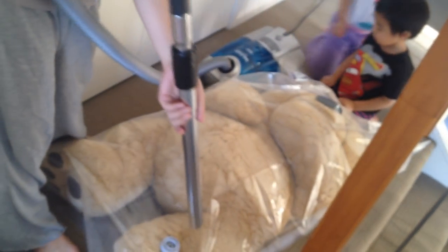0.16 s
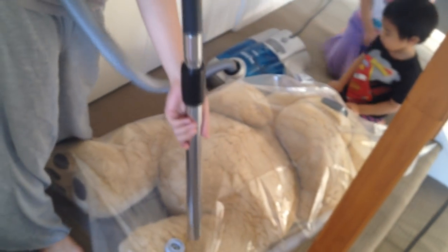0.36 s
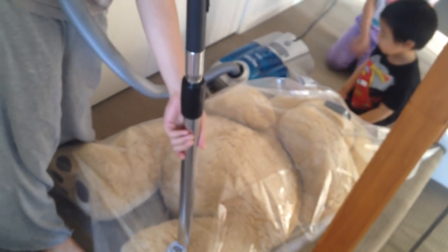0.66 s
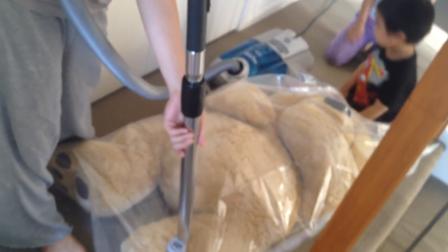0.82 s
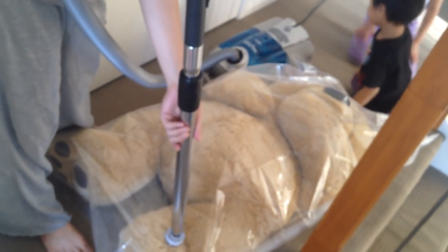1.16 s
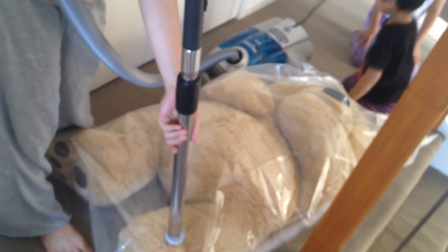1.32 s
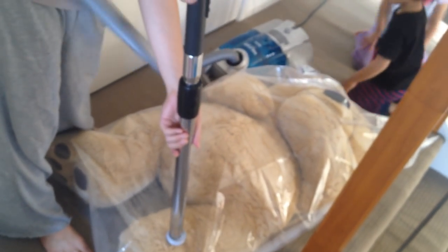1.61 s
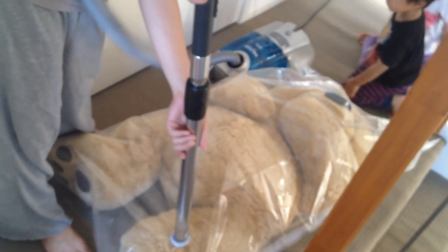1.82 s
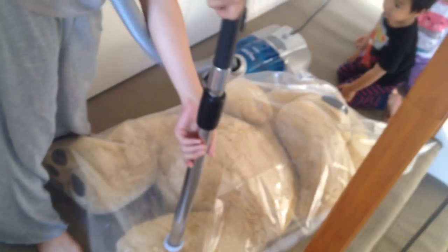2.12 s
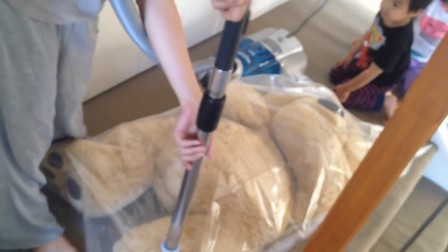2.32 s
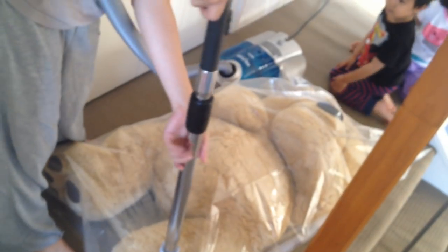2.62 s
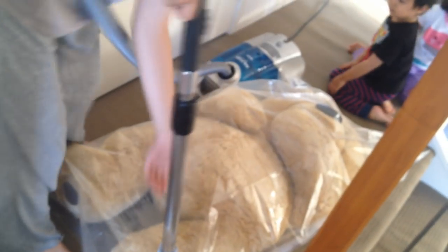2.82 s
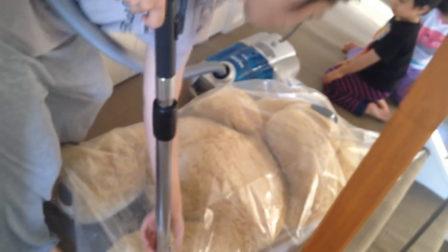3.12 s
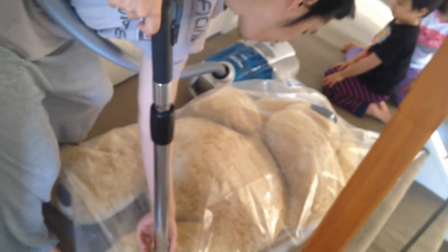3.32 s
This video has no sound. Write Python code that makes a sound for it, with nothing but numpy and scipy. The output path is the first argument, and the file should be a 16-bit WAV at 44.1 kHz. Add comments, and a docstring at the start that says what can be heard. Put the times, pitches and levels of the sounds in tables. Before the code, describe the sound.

A vacuum cleaner runs nearby in a room with a steady roar and faint whine. Its nozzle knocks against a storage bag's valve, hisses loudly and snaps tight. The motor rises in pitch while the plastic faintly crinkles.

```python
"""The steady roar and faint whine of a canister vacuum cleaner fill a living room, as turbulent air
rushes into its open metal wand. The wand knocks against the valve of a plastic storage bag, air hisses
through the gap, and it snaps home. With the flow choked, the motor speeds up and the roar thins;
the bag rumbles and crinkles as it empties."""
import sys
import numpy as np
from scipy import signal
from scipy.fft import rfft, irfft
from scipy.io import wavfile
from scipy.ndimage import uniform_filter1d

SR = 44100
rng = np.random.default_rng(int(sys.argv[2]) if len(sys.argv) > 2 else 0)


def transcribe(signal):
    """Save signal, clipped to [-1, 1], as a 16-bit WAV file at the path in sys.argv[1]."""
    frames = np.atleast_2d(signal).T
    limited = np.clip(frames, -1, 1)
    pcm = np.round(limited * 32767).astype(np.int16)
    wavfile.write(sys.argv[1], SR, pcm)


N = 152586
T = np.arange(N) / SR


def undb(db):
    """Amplitude grows tenfold for every 20 dB."""
    return 10 ** (np.asarray(db) / 20)


def unit(x):
    """Normalisation to an rms of 1."""
    return x / np.sqrt(np.mean(x ** 2) + 1e-20)


def curve(rows):
    """Linear interpolation between rows of time in seconds and value."""
    return np.interp(T, *np.array(rows, float).T)


def step(at_s, length_s):
    """A smooth transition from 0 to 1."""
    return .5 + .5 * np.tanh((T - at_s) / length_s)


def walk(rate_hz):
    """Smoothing held random values gives a slow drift of rms 1."""
    hold = int(SR / rate_hz)
    stairs = np.repeat(rng.standard_normal(400), hold)[:N]
    return unit(uniform_filter1d(uniform_filter1d(stairs, hold), hold))


def noise():
    """Independent samples have a white spectrum."""
    return rng.standard_normal(N)


def colour(x, points):
    """A minimum-phase, hence causal, filter through points of frequency in Hz and gain in dB."""
    hz, db = np.array(points, float).T
    bins_hz = np.maximum(np.fft.rfftfreq(N, 1 / SR), 1)
    gain = undb(np.interp(np.log(bins_hz), np.log(hz), db))
    cepstrum = irfft(np.log(gain), N)
    cepstrum[1:N // 2] *= 2
    cepstrum[N // 2 + 1:] = 0
    return irfft(rfft(x) * np.exp(rfft(cepstrum)), N)


def band(x, hz, width_hz):
    """Two resonators in cascade pass a steep band, scaled to rms 1."""
    b, a = signal.iirpeak(hz, hz / width_hz, SR)
    return unit(signal.lfilter(b, a, signal.lfilter(b, a, x)))


def tail(t60_s):
    """Dense reflections merge into exponentially decaying noise, here of unit energy."""
    response = noise() * undb(-60 * T / t60_s)
    return response / np.sqrt(np.sum(response ** 2))


def room(x):
    """Reverberation: the bright reflections of a furnished room add to the direct sound."""
    low_cut = signal.butter(2, 880, "high", fs=SR, output="sos")
    walls = signal.sosfilt(low_cut, tail(t60_s=0.33))
    return x + undb(-5.5) * signal.fftconvolve(x, walls)[:N]


def air(points):
    """Turbulence radiates broadband noise that flickers band by band and swells as a whole."""
    flicker_db, swell_db = 0.5, 0.34
    spectrum = rfft(noise())
    zone = np.digitize(np.fft.rfftfreq(N, 1 / SR), [300, 700, 1500, 3000, 6500, 9500])
    flow = sum(irfft(spectrum * (zone == k), N) * undb(flicker_db * walk(24.45))
               for k in np.unique(zone))
    return unit(colour(room(flow), points)) * undb(swell_db * walk(4.88))


def suction():
    """Flow noise: the roar of the open wand gives way to the thinner rush of the sealed one."""
    # Spectra of the open and the sealed wand. Each row: frequency in Hz, relative density in dB.
    open_spectrum = [(60, -37), (140, -20.5), (180, -12), (240, -3.5), (320, -8), (400, -4.5), (460, -10),
                     (660, -9), (780, -4.5), (930, -5), (1420, -6.5), (2300, -4.5), (3300, -14),
                     (4200, -11.5), (5500, -16), (6400, -12.5), (7600, -3.5), (8600, -2), (9700, -8.5),
                     (11000, -7.5), (13100, -13), (14000, -20), (15500, -25)]
    sealed_spectrum = [(60, -35), (110, -23), (160, -10.5), (270, -8.5), (360, -13.5), (470, -13),
                       (680, -14), (1000, -12), (1120, -9.5), (1450, -9), (1800, -6.5), (2350, -6),
                       (3500, -15), (4300, -10.5), (5300, -14.5), (6400, -13.5), (7900, -1), (9000, -2),
                       (11700, -5), (13700, -9), (15500, -23.5)]
    touch_s, seal_s = 1.49, 1.885  # the nozzle covers the valve; the gap closes
    uncovered = 1 - step(touch_s, 0.0086)
    approach = np.exp(np.minimum(T - touch_s, 0) / 0.47)  # the mids swell as the nozzle nears the bag
    mids = undb(-42) * approach * band(noise(), hz=2100, width_hz=1500)
    roar = undb(-37) * air(open_spectrum) + mids
    rush = undb(-35) * air(sealed_spectrum)
    return uncovered * roar + step(seal_s, 0.022) * rush


def motor():
    """A rotor sounds at multiples of its shaft rate, which rises as the airflow is choked."""
    # Motor speed. Each row: time in seconds, shaft rate in Hz.
    speed = [(0, 491.2), (1.5, 492.4), (1.57, 494.8), (1.7, 502.5), (1.82, 510), (1.9, 512), (2.0, 518.6),
             (2.24, 527.2), (2.41, 530.7), (2.62, 532.8), (2.9, 534.5), (3.46, 536.6)]
    # Tones at the shaft rate, the blade rate and its octave. Each row: time in seconds, level in dB.
    shaft_tone = [(0, -59.5), (.8, -55.5), (1.45, -56), (1.58, -71), (1.72, -55.5), (1.85, -59),
                  (2.03, -59.5), (2.15, -59), (2.6, -56.5), (3.46, -56.5)]
    whine = [(0, -57), (.75, -57), (1.0, -51), (1.45, -50), (1.56, -53), (1.85, -50), (2.02, -49),
             (2.1, -56), (2.23, -49), (2.33, -58), (2.45, -48), (2.56, -42), (2.7, -38.5), (2.8, -43),
             (2.92, -51), (3.46, -53)]
    octave = [(0, -61), (.55, -59), (.72, -49), (1.4, -57), (1.88, -57), (1.945, -32), (1.99, -48),
              (2.5, -56), (3.0, -56.5), (3.46, -47)]
    # Shaft overtones. Each row: multiple of the shaft rate, level in dB.
    overtones = [(2, -65.5), (3, -85), (4, -83)]
    blades, wow, flutter_db = 9, 0.0003, 0.5
    phase = 2 * np.pi * np.cumsum(curve(speed) * (1 + wow * walk(30.15))) / SR
    tones = [(1, curve(shaft_tone)), (blades, curve(whine)), (2 * blades, curve(octave))] + overtones
    return np.sqrt(2) * sum(undb(db + flutter_db * walk(22.37)) * np.sin(k * phase) for k, db in tones)


def room_tone():
    """The noise floor: the faint bass of the house and a trace of mains hum."""
    # Spectrum of the quiet room. Each row: frequency in Hz, relative density in dB.
    spectrum = [(30, -3), (60, -13), (100, 10), (200, 13.5), (1000, -4), (15000, -40)]
    mains = undb(-80.5) * np.sin(2 * np.pi * 96.4 * T)
    return undb(-71) * unit(colour(noise(), spectrum)) + mains


def leak():
    """A jet between nozzle and valve hisses, with edge tones while the flow is fastest."""
    # Envelope of the hiss. Each row: time in seconds, level in dB.
    envelope = [(1.462, -64), (1.472, -26), (1.5, -28.5), (1.54, -25.5), (1.63, -25), (1.76, -24),
                (1.86, -24.5), (1.895, -29.5), (1.915, -40), (1.99, -52), (2.1, -72)]
    # Spectrum of the jet. Each row: frequency in Hz, relative density in dB.
    spectrum = [(100, -55), (250, -17), (450, -23.5), (750, -22.5), (1800, -16.5), (2300, -13),
                (3600, -19.5), (4400, -14), (6000, -19.5), (6500, -8), (8400, 1), (9700, -2), (11300, -1.5),
                (13000, -5), (13600, -12), (15500, -18)]
    # Edge tones. Each row: frequency in Hz, resonator width in Hz, level in dB relative to the hiss.
    edge_tones = [(8450, 120, -17), (11020, 170, -14), (12700, 300, -22)]
    whistle = sum(undb(db) * band(noise(), hz, width) for hz, width, db in edge_tones)
    fast_flow = step(1.32, 0.027) - step(1.81, 0.03)
    return undb(curve(envelope)) * (air(spectrum) + whistle * fast_flow)


def knocks():
    """Impact excites damped modes: the nozzle is sucked onto the valve, cracks, bounces and rings."""
    # Impacts. Each row: start in seconds, relative level in dB, extra drive to the modes in dB.
    impacts = [(1.4755, -0.5, -3), (1.4803, -3.5, 1), (1.483, -22, -16), (1.8733, 4.5, -6),
               (1.8745, -7, 10.5), (1.8802, -4, -2), (1.887, -10, -18)]
    # Spectra of the contact and of its reflections. Each row: frequency in Hz, gain in dB.
    contact_spectrum = [(30, -50), (80, -31), (150, -11), (500, -0.5), (1000, -7.5), (2000, 4.5),
                        (2900, -2), (4200, -8), (7000, -8), (8500, 4.5), (11000, -27), (15500, -26)]
    echo_spectrum = [(30, -49), (80, -36), (140, -12), (280, -1), (600, -4), (950, -8.5), (1900, 0),
                     (3000, -5.5), (5000, -14), (8000, 1), (15500, -21)]
    # Modes of wand and bag. Each row: frequency in Hz, gain in dB, time to fall 60 dB in seconds.
    modes = [(149.3, -46.5, 0.31), (256, -37, .12), (367, -35, 0.15), (570, -44, 0.16), (780, -56, 0.088),
             (1450, -59, 0.038), (1960, -26, 0.039)]
    crack_s = 0.00078
    blows, thumps, cracks = np.zeros((3, N))
    for at, db, thump_db in impacts:
        blows[int(at * SR)] += undb(db)
        thumps[int(at * SR)] += undb(db + thump_db)
        cracks += undb(db) * (T >= at) * np.exp(-abs(T - at) / crack_s)
    bursts = np.sign(noise()) * cracks / np.sqrt(crack_s * SR / 2)  # unit energy for a 0 dB impact
    contact = colour(bursts, contact_spectrum)
    reflections = colour(tail(t60_s=0.3), echo_spectrum)
    echo = undb(-2.5) * signal.fftconvolve(blows, reflections)[:N]
    ring = sum(undb(db - 60 * T / t60) * np.cos(2 * np.pi * hz * T) for hz, db, t60 in modes)
    return undb(8.5) * (contact + echo) + signal.fftconvolve(thumps, ring)[:N]


def bag_rumble():
    """Air drawn from the bag makes narrow-band noise, heard as a soft rumble."""
    # Envelope of the rumble. Each row: time in seconds, level in dB.
    envelope = [(1.86, -74), (1.885, -46), (1.94, -44), (2.0, -77), (2.4, -62), (2.52, -54), (2.62, -65),
                (2.8, -64), (2.97, -51), (3.04, -63.5), (3.14, -53), (3.3, -55), (3.46, -62.5)]
    return undb(curve(envelope)) * band(noise(), hz=160.6, width_hz=35)


def bag_crinkles():
    """Shrinking plastic film emits random impulses in short flurries."""
    # Gaussian flurries. Each row: centre in seconds, level in dB, standard deviation in seconds.
    flurries = [(2.108, -41, 0.036), (2.214, -54, 0.013), (2.61, -50, .03), (2.867, -38.5, .03),
                (3.11, -40.5, 0.051)]
    ticks_per_s = 1700
    impulses = noise() * (rng.random(N) < ticks_per_s / SR)
    envelope = sum(undb(db) * np.exp(-.5 * ((T - at) / spread) ** 2) for at, db, spread in flurries)
    return envelope * band(impulses, hz=9200, width_hz=3000)


def choked_hum():
    """Harmonics of one fundamental form a faint hum that climbs and settles once the wand is sealed."""
    # Pitch glide. Each row: time in seconds, fundamental in Hz.
    pitch = [(2.0, 158.5), (2.3, 167), (2.6, 176.5), (2.8, 183.5), (3.46, 184)]
    # Harmonics. Each row: multiple of the fundamental, level in dB.
    harmonics = [(2, -67.5), (4, -64.5), (5, -65)]
    onset_s, wow, flutter_db = 2.25, 0.00297, 2.4
    phase = 2 * np.pi * np.cumsum(curve(pitch) * (1 + wow * walk(20))) / SR
    hum = sum(undb(db + flutter_db * walk(6.06)) * np.sin(k * phase) for k, db in harmonics)
    return np.sqrt(2) * step(onset_s, 0.037) * hum


def scene():
    """Superposition: all sources add at one point, the same in both channels."""
    machine = motor() + choked_hum() + suction()
    mix = machine + leak() + knocks() + bag_rumble() + bag_crinkles() + room_tone()
    return np.array([mix, mix])


def record(dry):
    """Band limiting: a steep low-pass filter removes the highest treble."""
    top_hz = 15750
    return signal.sosfilt(signal.ellip(10, .2, 80, top_hz, fs=SR, output="sos"), dry)


dry = scene()
out = record(dry)
transcribe(out)
```